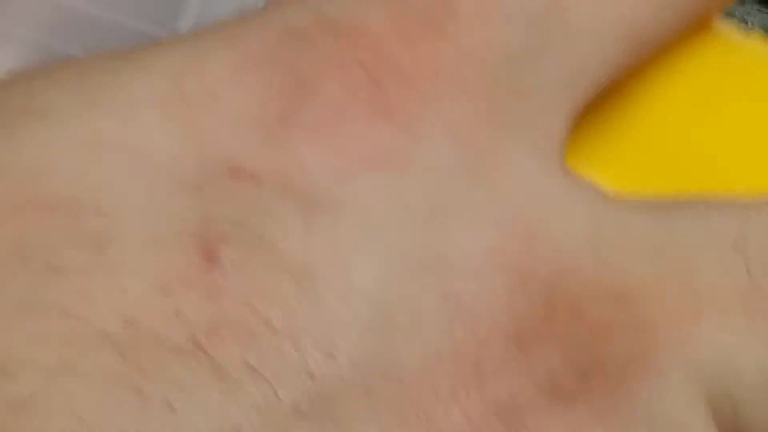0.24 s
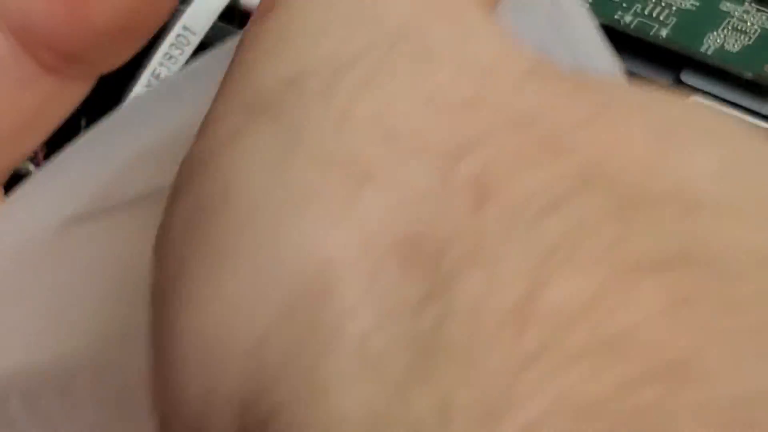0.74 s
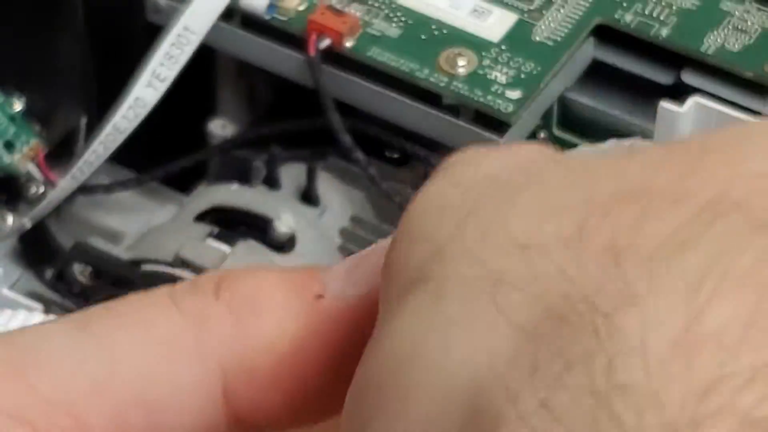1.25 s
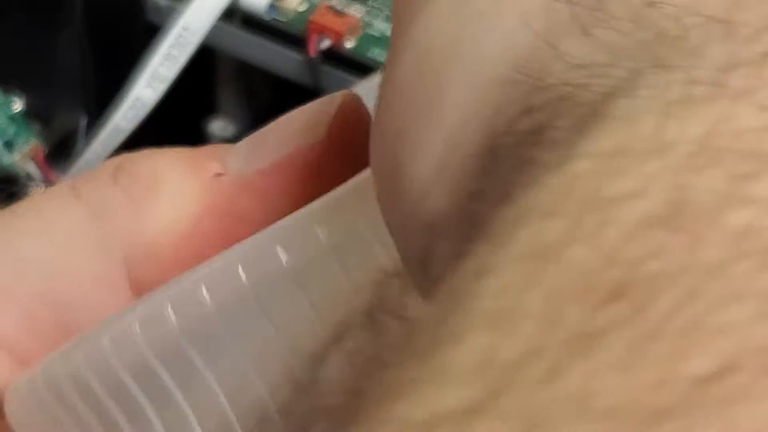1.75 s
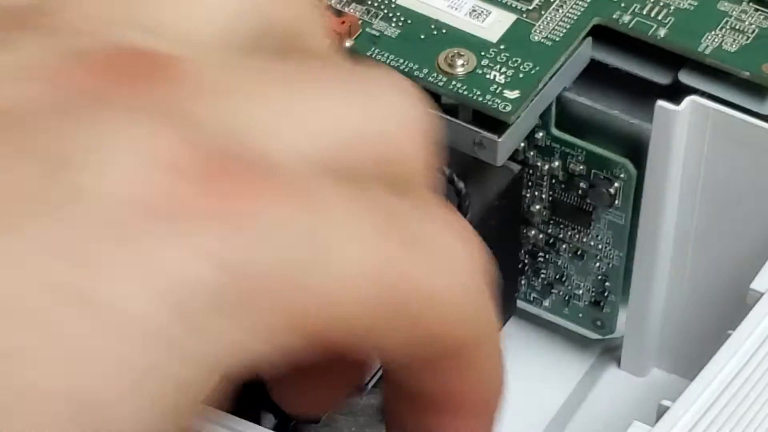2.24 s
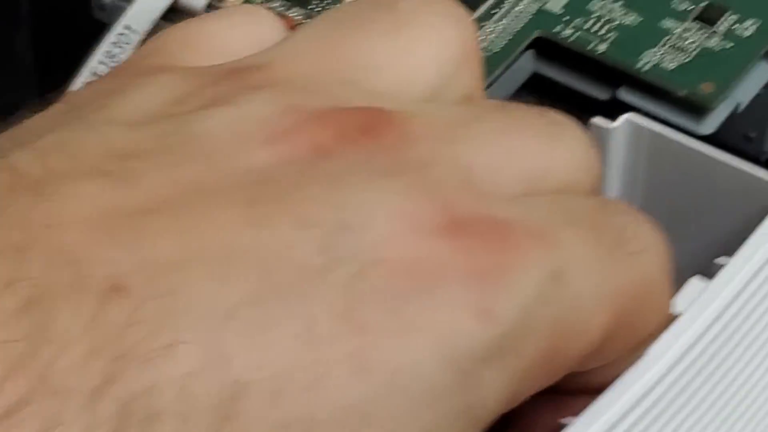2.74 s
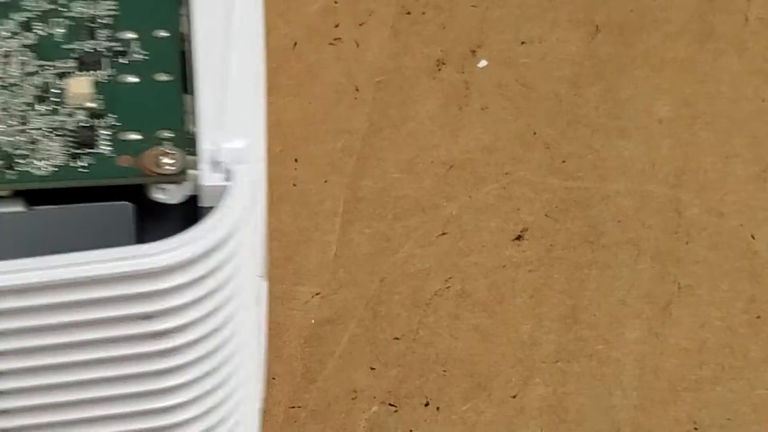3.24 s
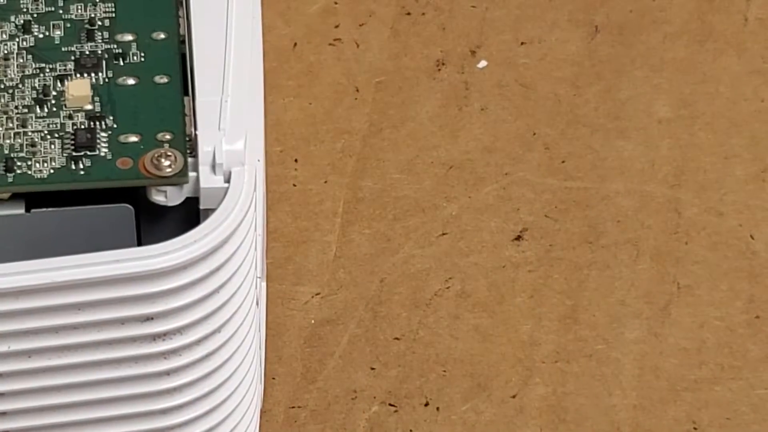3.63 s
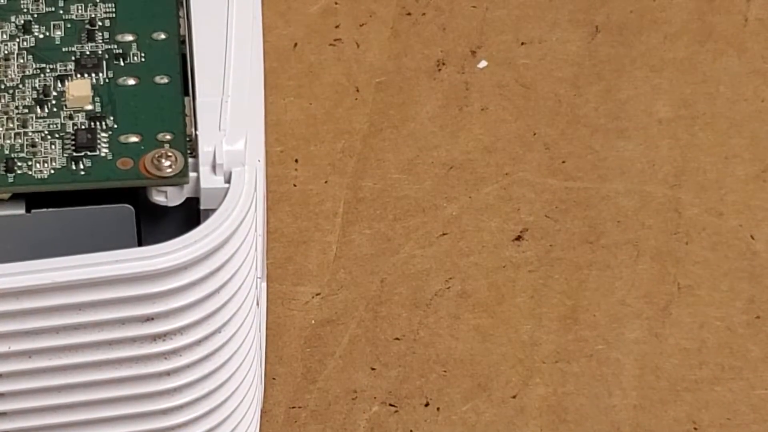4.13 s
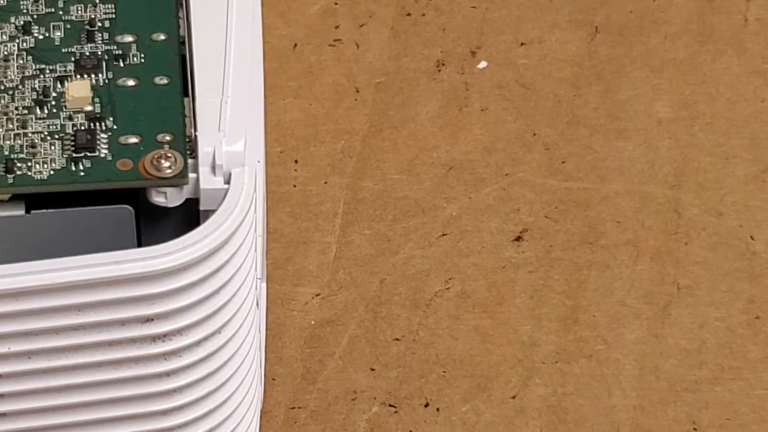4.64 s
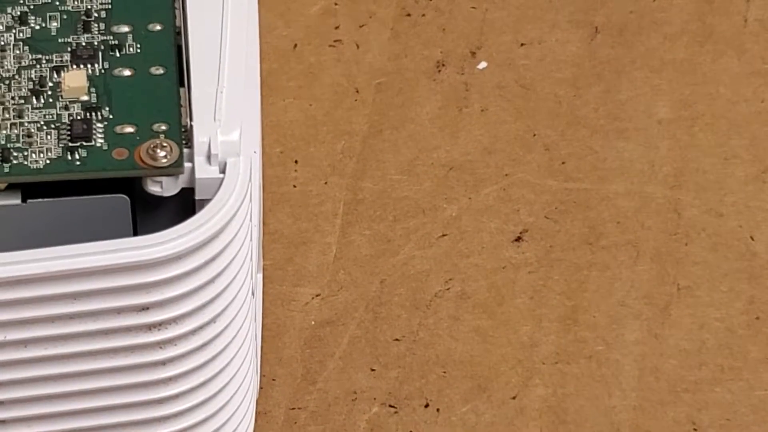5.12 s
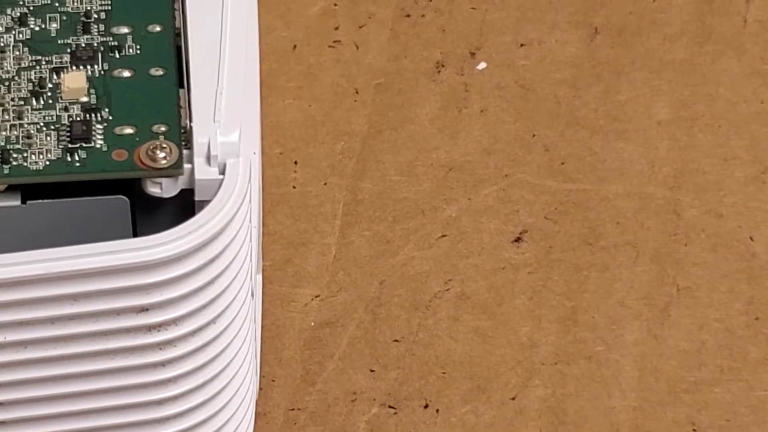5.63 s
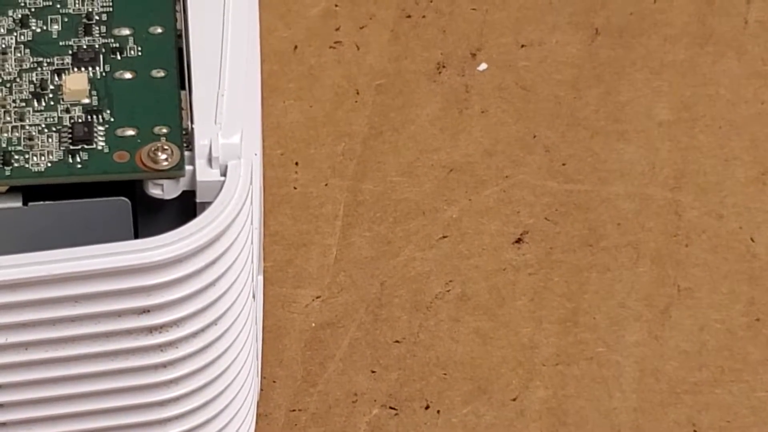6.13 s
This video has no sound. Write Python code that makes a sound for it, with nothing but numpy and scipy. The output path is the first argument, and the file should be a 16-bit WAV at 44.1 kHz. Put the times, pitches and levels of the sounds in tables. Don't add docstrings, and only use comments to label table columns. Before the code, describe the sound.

Over a low throbbing motor hum, a hand blower hisses and pops, a plastic case scrapes and bangs down, then strong puffs return.

```python
import sys
import numpy as np
from scipy import signal
from scipy.fft import rfft, irfft, next_fast_len
from scipy.io import wavfile
from scipy.ndimage import uniform_filter1d

SR = 44100
rng = np.random.default_rng(int(sys.argv[2]) if len(sys.argv) > 2 else 0)


def how_loud(loudness_db):
    steps = np.asarray(loudness_db, float) / 20
    return 10 ** steps


def transcribe(u):
    v = np.clip(np.atleast_2d(u).T, -1, 1)
    q = np.round(v * 32767).astype(np.int16)
    wavfile.write(sys.argv[1], SR, q)


N = 281137
TIME = np.arange(N) / SR

# (frequency [Hz], level [dB], ring factor [1])
BELLOWS_MODES = [(234, 3, 1.8), (440, 0.5, 2.5), (772, 6, 1.1), (810, 3.5, 0.11), (1316, -29.5, 0.43),
                 (1850, -35, 1.6), (2000, 9.5, 1.33), (3160, -47.5, 0.58)]


def band(x, lo_hz, hi_hz, order=2):
    edges = [lo_hz, min(hi_hz, .45 * SR)]
    return signal.sosfilt(signal.butter(order, edges, "bandpass", fs=SR, output="sos"), x)


def ring(x, hz, width):
    return signal.lfilter(*signal.iirpeak(hz, hz / width, fs=SR), x)


def unit(x):
    return x / np.sqrt(np.mean(x ** 2))


def walk(rate, size):
    k = int(SR / rate)
    held = np.repeat(rng.standard_normal(size // k + 1), k)
    return 1.77 * uniform_filter1d(held, k)[:size]


def late(x, ms):
    f = np.fft.rfftfreq(len(x), 1000 / SR)
    return irfft(rfft(x) * np.exp(-2j * np.pi * f * ms), len(x))


def played(table):
    s, *columns = np.transpose(table)
    span = slice(int(s[0] * SR), min(int(s[-1] * SR), N))
    t = TIME[span]
    fade = np.clip(np.minimum(t - s[0], s[-1] - t) / 0.0013, 0, 1)
    return span, [np.interp(t, s, c) for c in columns], fade


def sides(pan_db):
    return how_loud(np.array([pan_db, -pan_db]) / 2)


def decay(t, t60):
    return np.exp(-np.log(1000) * t / t60)


def coloured(x, points):
    hz, db = np.transpose(points)
    f = np.fft.rfftfreq(x.shape[-1], 1 / SR) + 1
    return irfft(rfft(x) * how_loud(np.interp(np.log(f), np.log(hz), db)), x.shape[-1])


def swell(row, rise_db, fall_db_s):
    start, rise, hold, peak_db, sag_db = row
    t = TIME - start - rise
    db = -rise_db * np.clip(-t / rise, 0, None) ** 2
    db = db - sag_db * np.clip(t / hold, 0, 1)
    db = db - fall_db_s * np.clip(t - hold, 0, None)
    return np.maximum(db, -90), peak_db


def hand_moves(rows):
    rise_db, fall_db_s = 4, 183
    return sum(how_loud(sum(swell(row, rise_db, fall_db_s))) for row in rows)


def background():
    hum_hz = [53.09, 58.5, 106.15, 119.97, 175.5]
    hum_db = [-37.5, -35, -40.5, -52, -56]
    # (frequency [Hz], density [dB per Hz])
    vent_colour = [(20, -17.5), (40, -26), (50, -18), (74, -1), (120, -5), (150, -18), (256, -17),
                   (591, -28), (962, -36), (1400, -45), (2900, -46), (7000, -51), (11000, -58.5),
                   (16000, -56)]
    # (time [s], level [dB])
    gain_ride = [(0.0, -33), (1.17, -32), (1.31, -36), (1.97, -35), (2.29, -37.5), (2.84, -31.5),
                 (3.51, -32), (3.74, -32.5), (4.12, -34), (4.35, -32), (4.88, -37), (5.04, -38),
                 (5.45, -40.5), (5.59, -39.5), (5.92, -39.5), (6.37, -39)]
    in_step_s, rest_db = 0.054, -32.5
    hum = np.zeros(N)
    for hz, db in zip(hum_hz, hum_db):
        level = np.sqrt(2) * how_loud(db + 1.35 * walk(3.42, size=N))
        hum += level * np.cos(2 * np.pi * hz * (TIME - in_step_s))
    mid, side = coloured(rng.standard_normal((2, next_fast_len(N))), vent_colour)
    side = coloured(side, [(60, -14.5), (250, -15), (1100, 1.5), (16000, -1)])
    noise = unit(np.array([mid + side, mid - side]))[:, :N] * how_loud(-36.5)
    gain = how_loud(np.interp(TIME, *np.transpose(gain_ride)) - rest_db)
    return (hum + noise * sides(1.1)[:, None]) * gain


def case_scrape():
    # (start [s], rise [s], hold [s], level [dB], sag [dB])
    rubs = [
        (-.02, 0.022, 0.00167, -46.5, 24),
        (0.644, 0.087, 0.15, -50.5, 1.5),
        (0.984, 0.0055, 0.0017, -50, 29),
    ]
    # (time [s], scrape level [dB])
    drag = [(2.5, -53), (2.524, -59.5), (2.754, -44), (3.068, -41), (3.08, -40), (3.12, -39), (3.286, -46),
            (3.33, -61)]
    # (time [s], delay [ms])
    bounce = [(2.5, 1.1), (2.8, 1.33), (3.0, 1.1), (3.15, 1.3), (3.33, 1.16)]
    # (frequency [Hz], width [Hz], level [dB], loudest at [s], lasts [s])
    shell_rings = [(790, 110, 3.5, 1.1, 0.15), (1240, 70, 13.5, 2.67, 0.12), (1880, 150, 6, 2.63, 0.19),
                   (2160, 105, 5.5, 3.19, 0.19), (2660, 290, 7.5, 2.98, 0.062), (2900, 99, 7, 2.58, 0.062),
                   (3200, 140, 6, 3.22, 0.08), (3580, 130, 6.5, 2.8, 0.063), (3450, 75, 8, 2.4, 0.052),
                   (3720, 110, 5.5, 3.06, 0.12), (4240, 180, 4.5, 2.7, 0.13), (6600, 430, 0, 3.27, 0.3)]
    rumble_db, fizz_db, fizz_grows_db_s = -8.5, -7.5, 8
    span, (db,), fade = played(drag)
    rub = hand_moves(rubs)
    rub[span] += how_loud(db) * fade
    size = span.stop
    t = TIME[:size]

    grit = rng.standard_normal((2, size)) * how_loud(.7 * walk(200, size=size))
    here = np.arange(size)
    back = here - np.interp(t, *np.transpose(bounce)) * SR / 1000
    grit = grit + .25 * np.array([np.interp(back, here, g) for g in grit])

    shell = 0.58 * grit
    for hz, width, ring_db, loudest, lasts in shell_rings:
        fading_db = 3.6 * np.minimum(((t - loudest) / lasts) ** 2, 3)
        shell = shell + how_loud(ring_db - fading_db) * ring(grit, hz, width)

    fizz_db = fizz_db + fizz_grows_db_s * np.clip(t - drag[0][0], 0, None)
    parts = unit(band(shell, 1500, 5000))
    parts = parts - how_loud(rumble_db) * unit(band(shell, 400, 1500))
    parts = parts - how_loud(fizz_db) * unit(band(shell, 5000, 19000))
    flutter = how_loud(.4 * walk(25, size=size))
    out = np.zeros((2, N))
    out[:, :size] = 0.81 * parts * rub[:size] * flutter * sides(4.2)[:, None]
    return out


def blows(events, modes, t60, pan_db, crack_db, rattle_db, reach_db_octave=-9.0):
    out, t = np.zeros((2, N + SR)), np.arange(SR // 6) / SR
    hz, db, factor = np.transpose(modes)[:, :, None]
    t60 = max(t60, .01)
    for s, peak_db, thud_db, tick_db, spot_hz in events:
        chance, noise = rng.standard_normal((5, len(modes), 1)), rng.standard_normal((3, len(t)))
        reach_db = np.where(hz < 600, thud_db, reach_db_octave * np.abs(np.log2(hz / spot_hz)))
        size = how_loud(db + reach_db) * decay(t, t60 * factor)
        size *= np.cos(2 * np.pi * hz * .025 * chance[3] * t)
        size *= np.cos(2 * np.pi * np.maximum(hz - 300, 0) * (.05 + .02 * chance[4]) * t)
        turn = 2 * np.pi * hz * (1 + 0.028 * chance[2]) * t
        apart = np.clip((hz - 250) / 740.0, 0, 1)
        body = np.array([np.sum(size * how_loud(1.5 * apart * c) * np.sin(turn + 1.1 * apart * c), axis=0)
                         for c in chance[:2]])
        body *= (1 - np.exp(-t / 0.0016)) / np.sqrt(len(modes))

        crack = np.cos(2 * np.pi * (600 + 0.23 * spot_hz) * (t - .0011) - 1)
        crack *= np.exp(-((t - .0011) / 0.00026) ** 2)

        lo_hz, hi_hz = 0.33 * spot_hz + 200, 1.12 * spot_hz + 1200
        rattle = unit(band(noise[:2] + 0.23 * noise[2], lo_hz, hi_hz, order=2))
        rattle = rattle * decay(t, 1.05 * t60)

        tick = unit(band(noise[:2], 4000, 8000, order=1))
        tick = tick * (np.exp(-t / 0.0011) + 0.04 * np.exp(-t / 0.0077))

        blow = body + how_loud(crack_db) * crack + how_loud(rattle_db) * rattle + how_loud(tick_db) * tick
        start = int(s * SR)
        out[:, start:start + len(t)] += how_loud(peak_db) * sides(pan_db)[:, None] * blow
    return out[:, :N]


def hollow_thumps():
    # (time [s], peak [dB], thud against it [dB], tick against it [dB], pitch of the spot struck [Hz])
    bumps = [(0.020, -33, -15, -40, 570), (1.686, -19, -7, -25, 700), (1.712, -21.5, -14, -40, 660),
             (2.326, -33.5, -25, -30, 770), (3.058, -26.5, -25, -20, 780), (3.101, -33, -25, -20, 775),
             (3.124, -27, -30, -15, 790), (3.365, -28, -20, -40, 700), (4.135, -36, -25, -40, 800),
             (4.187, -38, -25, -30, 850), (4.205, -38, -25, -40, 800), (5.1, -34, -20, -40, 900)]
    # (frequency [Hz], level [dB], ring factor [1])
    hollow_modes = [(261, 4, 0.7), (654, 8.5, 0.61), (785, 8.5, 1.06), (980, 0, 0.97), (2030, 21, 0.49),
                    (3700, 12, .4)]
    return blows(bumps, hollow_modes, t60=0.076, pan_db=4.0, crack_db=-26, rattle_db=-24,
                 reach_db_octave=-10.0)


def jet_at_ports(size, lead_ms, scatter_db):
    jet, *eddies = rng.standard_normal((3, size))
    t_ms = np.arange(600) * 1000 / SR
    paths = rng.standard_normal((2, len(t_ms))) * np.exp(-t_ms / 3.8)
    paths = rfft(band(paths, 530, 13000, order=1), 2048)
    paths = irfft(paths / np.abs(paths) ** .75)
    scatter = unit(signal.fftconvolve(jet[None], paths, axes=1)[:, :size])
    straight = np.array([late(jet, 1 - lead_ms), late(jet, 1)])
    return straight + how_loud(scatter_db) * scatter + .75 * np.array(eddies)


def bellows_air():
    # (start [s], rise [s], hold [s], top hiss [dB], sag over the hold [dB])
    squeezes = [
        (0.246, 0.058, 0.076, -33, 0.5),
        (1.098, 0.022, 0.1, -21, 0.5),
        (1.633, 0.063, 0.092, -35, 4.5),
        (4.681, 0.077, 0.14, -18.5, 15.5),
        (5.2, 0.059, 0.094, -22, -0.5),
        (5.641, 0.05, 0.083, -18.5, 13.5),
        (6.052, 0.049, 0.053, -21.5, -1.5),
    ]
    # (start [s], rise [s], hold [s], top hiss [dB], sag [dB])
    refills = [(.45, 0.073, 0.04, -42.5, 5.6), (1.3, 0.051, 0.063, -50.5, 1),
               (1.861, 0.081, 0.026, -46, 2.5), (4.958, 0.078, 0.071, -45, 2.3),
               (5.428, 0.097, 0.058, -44, 0.59), (5.85, 0.076, 0.052, -44.5, 4.4),
               (6.27, 0.13, .05, -44, 1)]
    # (left leads [ms], scatter off the board [dB], middle hiss against top hiss [dB],
    # drumming on the parts against top hiss [dB], left minus right [dB])
    nozzle = [(0.085, 1, -0.5, 4.5, 0.59), (-0.068, 1, -1.5, -7, 0.8), (-0.066, 0, 0.5, 0, 0.93),
              (0.132, -1, -6, -21.5, 3.2), (0.137, -2, -5, -22.5, 3), (0.17, 4.5, -5.5, -20, 2.9),
              (0.172, -1.5, -3.5, -15, 2.4)]
    # (frequency [Hz], density [dB per Hz])
    into_fan = [(250, -28.5), (641, -11), (900, -16), (1700, -10.5), (2480, -16), (3000, -17.5),
                (3700, -10.5), (5200, -11.5), (9140, -16), (15500, 5)]
    into_cavity = [(250, -36), (553, -11.5), (877, -23.5), (1330, -6.5), (2300, -10), (3500, -7),
                   (6570, -7), (8500, -6.5), (14500, 6.5)]
    along_board = [(250, -9), (500, -5), (907, -16), (1300, -10.5), (2200, -12.5), (3070, -8), (7020, -5),
                   (8200, -7.5), (15500, 3)]
    from_side = [(180, -63.5), (300, -13), (592, 6), (1020, -14), (1270, -17), (2600, -14), (3000, -11.5),
                 (3500, -17), (3950, -17), (4450, -14), (6310, -8.5), (9000, -1.5), (10600, -5.5),
                 (13300, -1.5)]
    # (roar [dB], drumming [dB], middle hiss [dB])
    intake_db = [
        (-3.5, -3.5, 0),
        (-31, -8, 3),
        (-9, -1.5, 1.5),
        (-27, -16.5, -3.5),
    ]
    # (frequency [Hz], width [Hz], level over the jet [dB])
    aim_hollows = [
        [(1490, 43, 2.5), (1900, 280, -2), (2940, 140, 11), (3240, 200, -7)],
        [(1360, 120, -13), (2140, 99, -0.5), (3370, 210, -8.5), (4100, 200, 0), (6470, 140, 3.5)],
        [(720, 100, 3), (1285, 60, 3), (3020, 37, -5), (5060, 150, -5)],
        [(4610, 960, 4.5), (5230, 340, -1.5), (6550, 230, -5)],
    ]
    follow = (0.58, 0.76, 0.86)
    edges = [(300, 1000), (1000, 3300), (3300, 9500), (9500, 19000)]  # roar, drumming, middle, top [Hz]
    roar_db = -10.5
    targets = list(zip([into_fan, into_cavity, along_board, from_side], intake_db, aim_hollows))
    targets += targets[-1:] * 3
    out = np.zeros((2, N))
    for squeeze, refill, aim, target in zip(squeezes, refills, nozzle, targets):
        lead_ms, scatter_db, mid_db, drum_db, pan_db = aim
        colour, intake, hollows = target
        start = int((squeeze[0] - .03) * SR)
        span = slice(start, min(start + 25600, N))
        size = span.stop - span.start
        push, push_db = swell(squeeze, rise_db=61.5, fall_db_s=370)
        pull, pull_db = swell(refill, rise_db=18.5, fall_db_s=156)

        jet = jet_at_ports(size, lead_ms, scatter_db)
        blown = jet
        for hz, width, db in hollows:
            blown = blown + how_loud(db + 1.6 * walk(13, size=size)) * ring(jet, hz, width)
        blown = coloured(blown, colour)

        out_db = [drum_db + roar_db, drum_db, mid_db, 0]
        in_db = [*intake, 0]
        for (lo, hi), o, i, share in zip(edges, out_db, in_db, [*follow, 1]):
            flow_out = how_loud(push_db + o + share * push[span])
            flow_in = how_loud(pull_db + i + pull[span])
            flow = np.hypot(flow_out, flow_in) * how_loud(0.9 * walk(27.2, size=size))
            out[:, span] += 1.43 * unit(band(blown, lo, hi, order=3)) * flow * sides(pan_db)[:, None]
    return out


def bellows_pops():
    # (time [s], peak [dB], thud against it [dB], tick against it [dB], pitch of the spot [Hz])
    pops = [(0.512, -15.5, -25, -14, 900), (0.75, -23, -32, -30, 790), (0.786, -26, -31, -38, 1270),
            (0.984, -61, 32, -23, 647), (1.1107, -31, 10.5, 26.5, 2130), (1.911, -40, 2, 1, 2330),
            (1.94, -29.5, -12, -18, 790)]
    return blows(pops, BELLOWS_MODES, t60=0.055, pan_db=6.0, crack_db=1.0, rattle_db=-6.5)


def latch_clicks():
    # (time [s], peak [dB], thud against it [dB], tick against it [dB], pitch of the spot [Hz])
    clicks = [(0.7477, -26, -32, -20, 3600), (1.1104, -7.5, -36, -4, 4200), (1.685, -25, -33, -25, 2140),
              (1.686, -26, -33, -27, 3600), (2.2747, -40, -28.5, -24, 2510),
              (2.3246, -21, -34, -11.5, 2480), (2.479, -24.5, -30, -16, 2070), (2.486, -35, -30, -22, 2920),
              (4.1121, -33, -28, -9, 2240), (4.4278, -20, -30, -9, 2090), (5.1233, -39, -28, -20, 1980),
              (5.5533, -21, -34.5, -40, 4200), (5.6824, -23, -29, -17, 4500)]
    # (frequency [Hz], level [dB], ring factor [1])
    latch_modes = [(1725, 4, 0.99), (2140, 7.5, 0.77), (2590, 6, 0.89), (3170, -6, 0.71),
                   (3600, 14.5, 0.58), (4200, 0, 0.42)]
    return 0.79 * blows(clicks, latch_modes, t60=0.031, pan_db=3.0, crack_db=-52, rattle_db=-16.5,
                        reach_db_octave=-19.0)


def case_knocks():
    # (time [s], peak [dB], thud against it [dB], tick against it [dB], pitch of the spot struck [Hz])
    knocks = [(2.119, -57.5, -2, 17.5, 680), (2.277, -62, -2, -12, 660), (2.304, -52.5, -3, 9, 767),
              (2.324, -38, -12, 1, 730), (2.478, -41, -30, -9, 1960), (3.349, -6.5, -21.5, -42, 1450),
              (3.465, -34.5, -7, 0, 915), (3.479, -24.5, -12, -19, 740), (3.514, -28, -17, -40, 802),
              (3.5365, -1.5, -14, -25, 1650), (3.5425, -10.5, -12.5, -30, 1450),
              (3.605, -7.5, -15.5, -16, 1350), (3.616, -14.5, -5.5, -34, 1320),
              (3.836, -27, -12.5, -22, 880), (3.869, -44, -10, 5, 1590), (3.902, -32.5, -13, -31, 681.5),
              (4.112, -16.5, -16, -22, 860), (4.186, -32.5, -11, -6, 851), (4.276, -25.5, -14, -38, 655),
              (4.299, -29.5, -14, -40, 1460), (4.339, -31, -10, -27, 651), (4.352, -31.5, -7, -37.5, 810),
              (4.427, -9, -19, -45.5, 2000)]
    # (frequency [Hz], level [dB], ring factor [1])
    case_modes = [(185, 11, 0.83), (237.7, 13.5, 1.56), (386, 13.5, 1.12), (740, 9.5, 0.52), (895, -2, 1.3),
                  (1170, -31, 1.8), (1320, -1, 1.3), (1391, 1.5, 1.57), (1562, 2, 0.97), (1706, 4.5, 0.64),
                  (1874, 7, 0.76), (2092, 18.5, 0.26), (2480, -8, .7), (3100, -8, 0.65)]
    return blows(knocks, case_modes, t60=0.07, pan_db=2.5, crack_db=1.5, rattle_db=-16.5)


def foot_squeak():
    # (time [s], pitch [Hz], level [dB])
    glide = [(2.6, 14900, -72), (2.63, 15250, -60), (2.675, 15700, -61), (2.68, 15700, -90),
             (2.7, 12500, -90), (2.71, 12700, -64), (2.75, 13700, -61), (2.8, 13700, -60),
             (2.86, 12900, -61), (2.88, 12700, -85)]
    span, (hz, db), _ = played(glide)
    out = np.zeros((2, N))
    out[:, span] = how_loud(db) * np.sin(2 * np.pi * np.cumsum(hz) / SR)
    return out


def hand_rustle():
    # (start [s], rise [s], hold [s], level [dB], sag [dB])
    brushes = [
        (3.32, .04, 0.89, -46.5, 18.5),
        (3.798, 0.049, 0.016, -72, -21),
        (3.89, .05, 0.66, -82, -20),
    ]
    noise = rng.standard_normal((2, next_fast_len(N)))
    noise = coloured(noise, [(1500, -8), (4400, -7), (9000, -9.5), (15000, -10.5)])
    return hand_moves(brushes) * unit(noise)[:, :N]


def gripped_pops():
    # (time [s], peak [dB], thud against it [dB], tick against it [dB], pitch of the spot [Hz])
    pops = [(5.123, -22.5, -6, -27, 1840), (5.256, -24, -27, -18.5, 1240), (5.552, -53.5, 9, 12, 730),
            (5.598, -28.5, 1, -27, 1190), (5.652, -15, -14, -9, 1850), (6.0626, -9, -43, -27, 1500)]
    return blows(pops, BELLOWS_MODES, t60=0.031, pan_db=3.0, crack_db=5.0, rattle_db=-11.5)


def room(x):
    t = np.arange(SR // 2) / SR
    noise = band(rng.standard_normal((2, len(t))), 100, 3650, order=1)
    mid, side = noise * decay(t, 0.27) * (t > .004)
    tail = mid + coloured(side, [(300, -12.0), (900, -4.5)]) * np.array([[1], [-1]])
    tail = tail / np.sqrt(np.sum(tail ** 2) / 2)
    return how_loud(-12.5) * signal.fftconvolve(x, tail, axes=1)[:, :N]


def starve(x):
    # (centre [Hz], width [Hz], limit under the top hiss [dB])
    weak_bands = [(2400, 1000, -18), (2930, 300, -10), (3620, 900, -3.5), (6000, 500, -13),
                  (8000, 2400, -12.5)]
    sure_db, chance_db = 2.2, 3
    shift = 1024 - 860
    window = np.sin(np.pi * (np.arange(2048) + .5) / 2048)
    f, _, z = signal.stft(np.pad(x, ((0, 0), (shift, 0))), SR, window, 2048)
    bands, width = 28, 16
    top = bands * width
    power = np.mean(np.abs(z) ** 2, axis=0) + 1e-18
    hiss = power[(f > 10000) & (f < 15500)].mean(axis=0)
    under_db = 10 * np.log10(power[:top].reshape(bands, width, -1).mean(axis=1) / hiss)
    centre = f[width // 2:top:width]
    limit_db = np.max([np.where(abs(centre - hz) < wide / 2, db, -60) for hz, wide, db in weak_bands], axis=0)
    luck = np.repeat(rng.standard_normal(under_db.shape), 2, axis=1)[:, :under_db.shape[1]]
    kept = np.minimum(limit_db[:, None] - under_db, sure_db) < chance_db * luck
    keep = np.ones(power.shape)
    keep[:top] = np.repeat(kept, width, axis=0)
    return signal.istft(z * keep, SR, window, 2048)[1][:, shift:shift + N]


def scene():
    knocks = hollow_thumps() + bellows_pops() + latch_clicks() + case_knocks() + gripped_pops()
    hiss = bellows_air()
    rubbing = case_scrape() + foot_squeak() + hand_rustle()
    return background() + rubbing + knocks + hiss + room(knocks + 0.69 * hiss)


def roll_off(x):
    return signal.sosfilt(signal.butter(12, 16620, fs=SR, output="sos"), x)


def record(dry):
    # (frequency [Hz], width [Hz], depth [0-1])
    port_notch = (8300, 4240, 0.52)
    hz, width, depth = port_notch
    heard = dry - depth * ring(dry, hz, width)
    held = 1.5 * np.tanh(heard / 1.5)
    cut = signal.ellip(10, .2, 55, 15820, fs=SR, output="sos")
    mix = starve(signal.sosfilt(cut, held))
    return roll_off(mix)


dry = scene()
out = record(dry)
transcribe(out)
```